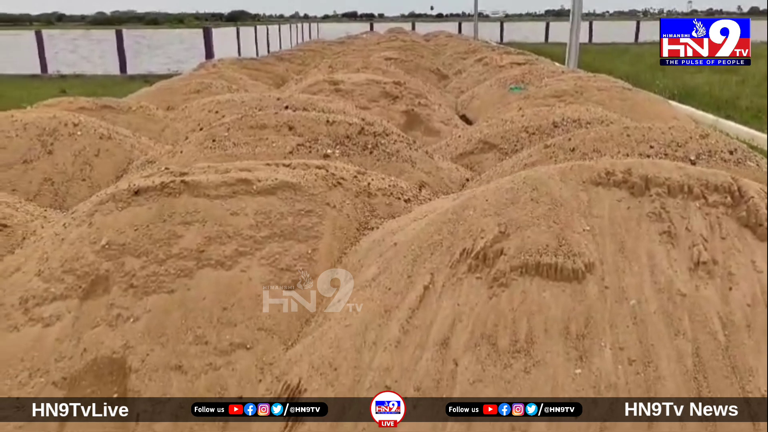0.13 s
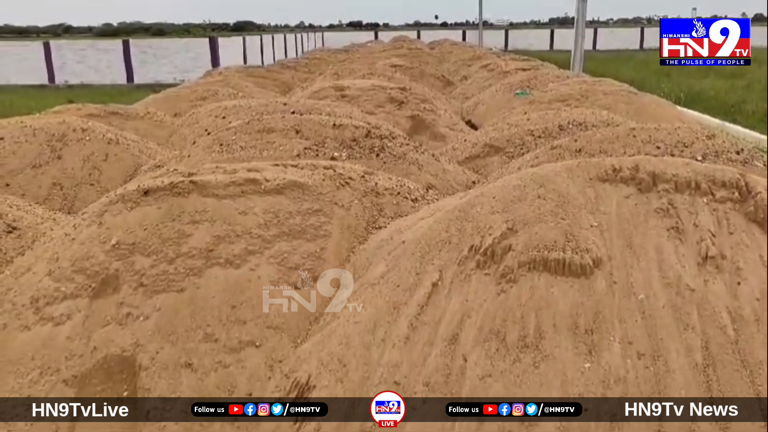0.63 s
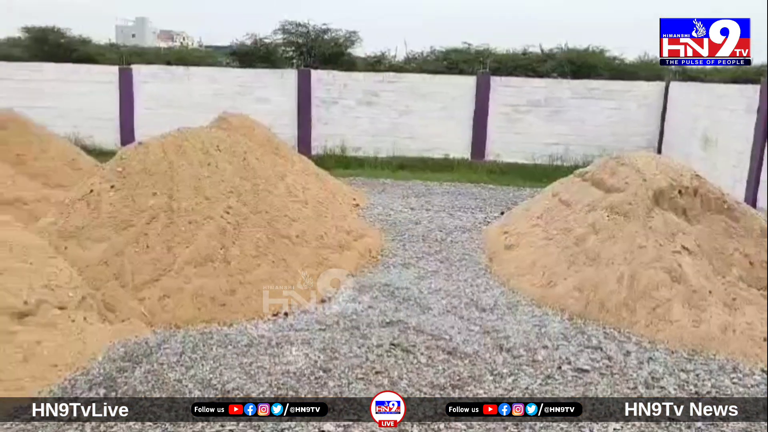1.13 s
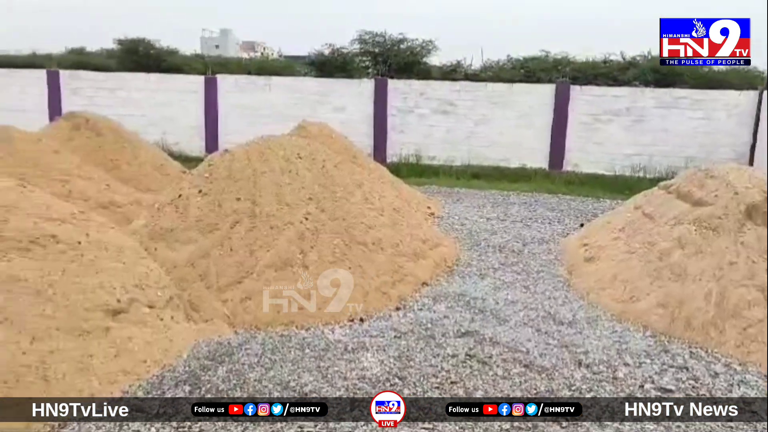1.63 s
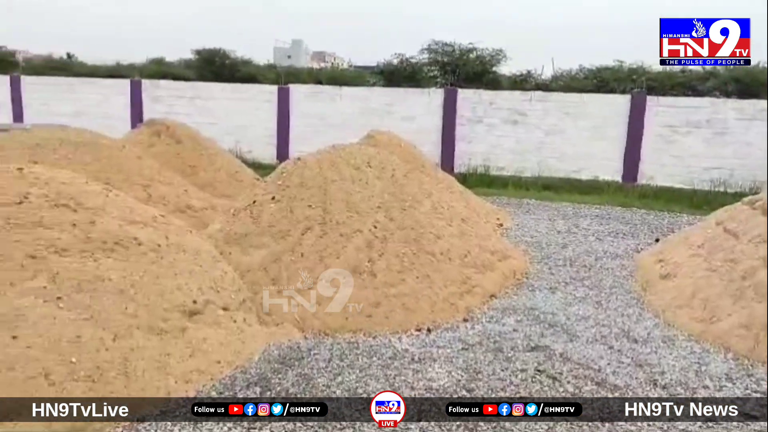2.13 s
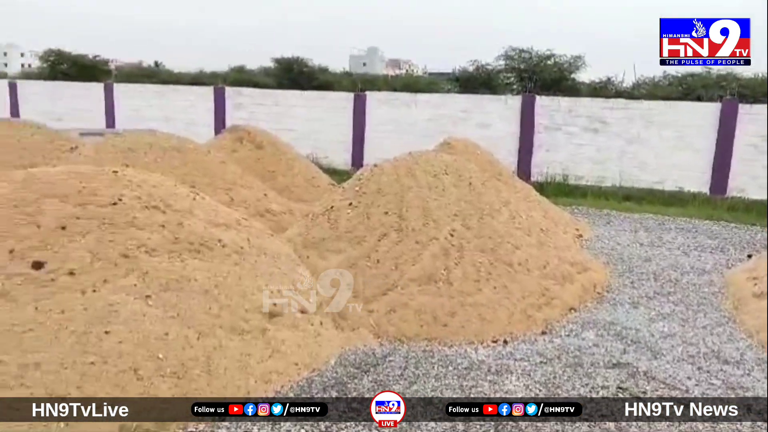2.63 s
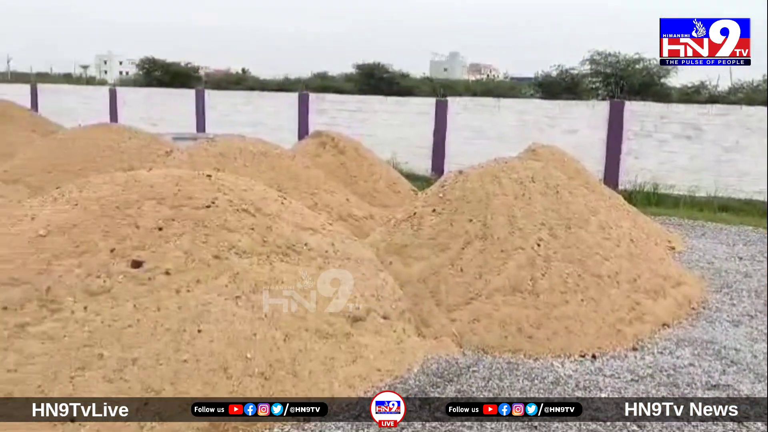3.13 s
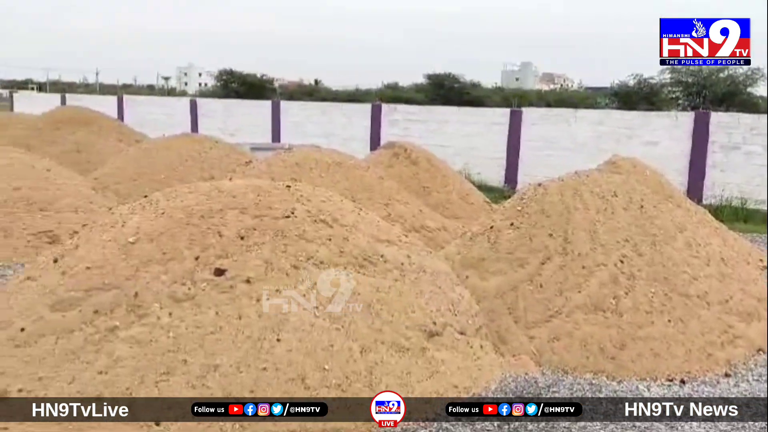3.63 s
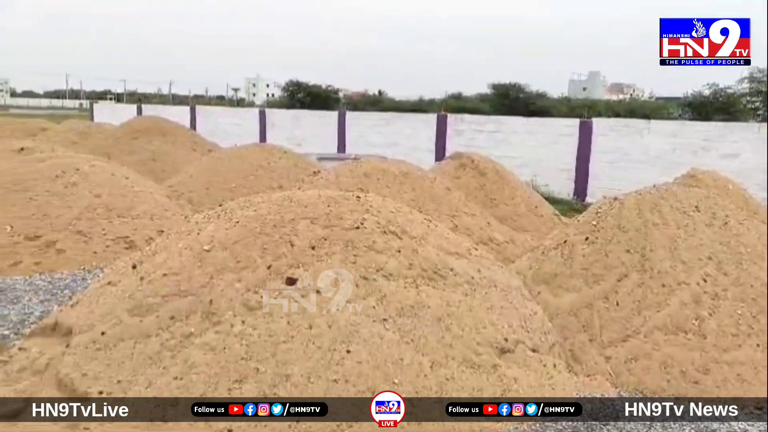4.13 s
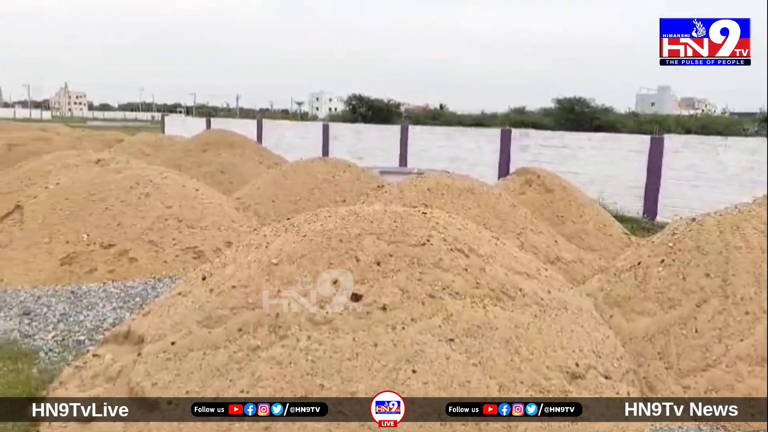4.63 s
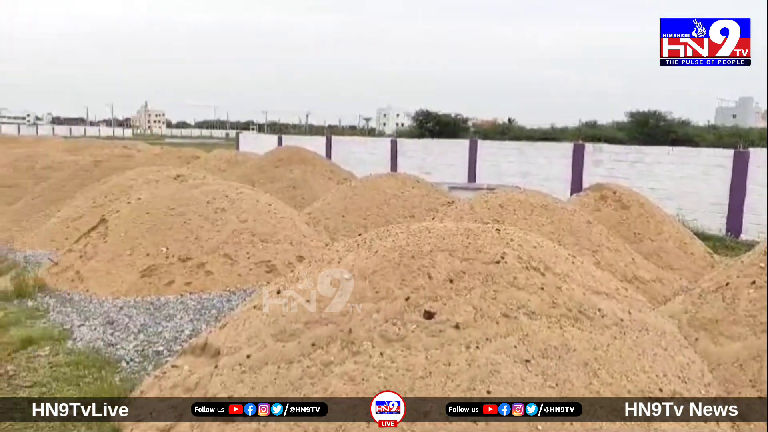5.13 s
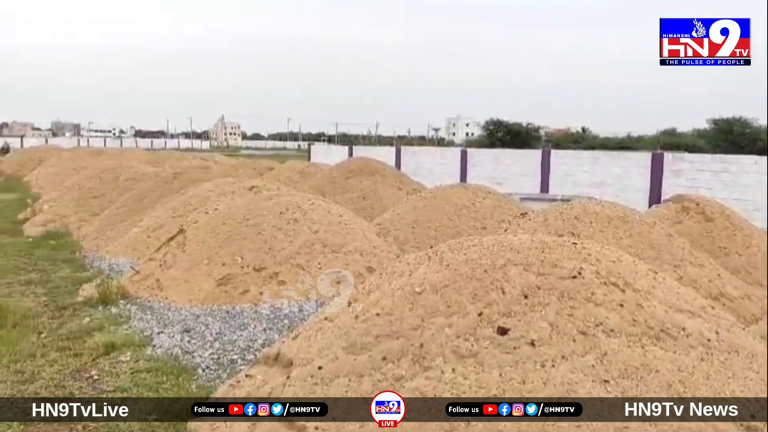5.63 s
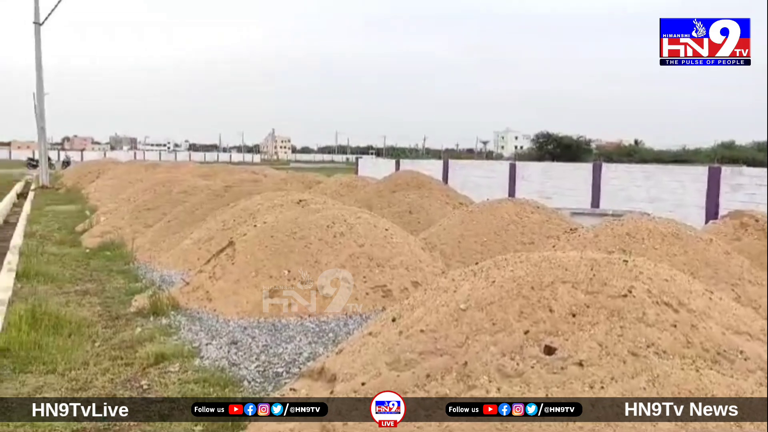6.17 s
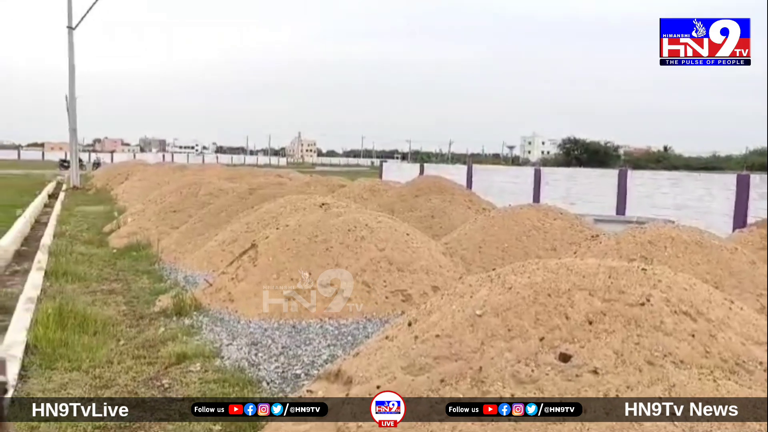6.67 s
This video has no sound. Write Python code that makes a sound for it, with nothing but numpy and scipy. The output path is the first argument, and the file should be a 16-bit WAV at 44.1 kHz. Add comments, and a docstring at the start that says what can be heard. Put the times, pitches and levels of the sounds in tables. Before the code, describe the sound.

Hard wind gusts thump and buffet the microphone, then after a quick cut insects drone and buzz while a small bird ticks and trills.

```python
"""Gusts of wind buffet two microphone ports, each on its own: lumpy low noise, with swings of pressure as eddies slap.
Around them is open ground: a field of insects drones as throbbing noise, one insect buzzes on the right in
bursts of short chirps, and another joins late as a shimmer. A small bird ticks and trills on the left in quick
sweeps, with chips, far calls, dry clicks and a smooth wash of air behind.
An edit fades the first, windier scene out and the second in."""
import sys
import numpy as np
from scipy import signal
from scipy.fft import rfft, irfft, next_fast_len
from scipy.io import wavfile
from scipy.ndimage import uniform_filter1d

SR = 44100
rng = np.random.default_rng(int(sys.argv[2]) if len(sys.argv) > 2 else 0)


def convert_level_to_amplitude(level_db):
    """Map a level in decibels to its linear amplitude factor."""
    exponent = np.asarray(level_db, float) / 20
    return 10 ** exponent


def waveform_to_disk(signal):
    """Save audio, clipped to [-1, 1], as 16-bit WAV at the path in sys.argv[1]."""
    frames = np.transpose(np.atleast_2d(signal))
    scaled = np.clip(frames, -1, 1) * 32767
    samples = np.round(scaled).astype(np.int16)
    wavfile.write(sys.argv[1], SR, samples)


N = 298998
T = np.arange(N) / SR  # time/s of every sample
LAG = 18  # samples by which a placed sound reaches the right port later

# breeze between the gusts: [t/s, left rumble level/dB, right rumble level/dB, flutter over rumble/dB]
BREEZE = [(0, -29, -33, 3), (.88, -30, -33.5, -9), (.93, -44, -44, -11), (1.3, -42, -40.5, -15.5),
          (2.3, -38.5, -43, -11), (3.1, -40, -42, -8), (3.9, -37, -38.5, -7.5), (4.5, -37.5, -36.5, -10),
          (5.3, -34, -35, -16), (6.78, -38, -34, -15.5)]
# gusts: [t/s, peak rumble level/dB, time to fall by 10 dB/s (0 = unheard), flutter over rumble/dB, left-right/dB]
GUSTS = [(.045, -23, .07, 8, 20), (.12, -12, .05, -6, 25), (.205, -10.5, .04, -2, 22),
         (.229, -16.5, 0.0254, -10, -24), (0.268, -9.5, 0.0429, 4, 26), (.354, -20, 0.0473, 2.5, -24),
         (0.432, -12.5, .035, 9.5, 21), (.49, -22, 0, -15, -24), (.539, -15, 0.034, 5.5, 28),
         (.6, -19, .045, 1.5, 24.5), (0.715, -9, 0.0642, 2, 30), (.83, -22, 0.0552, -7, 15),
         (1.334, -30, 0.08, -29, 18), (1.469, -19, .06, -18.5, 24), (1.703, -22, 0.07, -14, 13),
         (1.87, -23, 0.15, -29, 22), (2.04, -21.5, 0.05, -20, 25), (2.122, -23, 0.08, -19, 12),
         (2.486, -24.5, 0.12, -19, 21), (2.621, -29.5, 0.14, -14, 21), (2.826, -15.5, 0.08, -17, 24),
         (3.115, -15, 0.0568, -23, 28), (3.2, -24.5, .12, -28, 15), (3.364, -24.5, 0.22, -16, 10),
         (3.608, -13.5, 0.0642, -40, 26), (3.684, -23.5, 0.06, -38, -21), (3.868, -23, 0.07, -7.5, 18),
         (3.968, -20.5, 0.0548, -16, -12), (4.038, -22.5, .09, -17, 23), (4.103, -28, 0.1, -15, -12),
         (4.372, -27.5, .13, -28, 7), (4.68, -30.5, .15, -21, 5), (5.11, -27.5, 0.24, -20, 5),
         (5.431, -10.5, 0.0675, -22, 26), (5.56, -28.5, 0.3, -20, -2), (5.764, -28.5, 0.12, -16, 3),
         (5.924, -23.5, 0.1, -32, -16), (6.04, -20.5, 0.05, -38, -4), (6.188, -29, 0.4, -31, 14),
         (6.333, -24.5, 0.1, -33, -5), (6.722, -25.5, 0.12, -30, 3.5)]
GUST_RISE = 0.79  # rise time as a share of the fall time
# eddies that slap a port: [t/s, nominal peak level/dB, nominal f/Hz, left-right/dB]
SLAPS = [(0.093, -27, 300, 18), (0.138, -8, 330, 30.5), (.201, 1, 208, 37), (0.22, 0, 449, 41),
         (0.223, -3.5, 185, -29), (.242, -4, 350, 36), (0.25, -3.5, 193, 35), (0.258, -1.5, 196, 33),
         (0.352, -16, 257, -34), (.417, -9.5, 400, 31), (.434, -5, 216, 36), (0.477, -6.5, 450, 36),
         (0.485, -19, 110, -37), (0.533, -7, 398, 39), (0.58, -7, 330, 38), (0.606, -10.5, 395, 39),
         (.704, -8.5, 247, 30), (0.718, -10.5, 335, 37), (0.746, -14.5, 253, 30), (.816, -17, 300, 29),
         (1.47, -19, 105, 24), (1.741, -13, 111, 18), (2.035, -13.5, 116, 18), (2.817, -8.5, 128, 24),
         (2.88, -10, 98, 27), (3.104, -9.5, 124, 26), (3.571, -10.5, 76, 26), (2.822, -20.5, 345, 20),
         (3.958, -16, 118, -30), (5.409, -9.5, 84, 20), (5.471, -14.5, 135, 14)]
# crackles as the hardest gusts break: [t/s, relative level/dB]
CRACKLES = [(0.2034, -40.5), (0.2515, -43.5), (0.2553, -45), (0.2623, -45), (0.4369, -43)]
# insect field, one table a stretch: [t/s, relative level/dB, left-right before a 3 dB shift to the right/dB]
FIELD = [
    [(0.0, -52.5, 4.5), (0.144, -54, 4.5), (0.9, -59, 5.5)],
    [(1.05, -54.5, -4), (1.21, -53.5, 0.0), (4.15, -52.5, 8), (4.4, -51.5, 10.5), (5.09, -53, 7),
     (6.0, -55, 6)],
    [(6.1, -53.5, 8.5), (6.57, -51, 7), (6.78, -52, 7)],
]
# voices of the field, relative levels:
# [f/Hz, width/Hz, first scene left level/dB, right level/dB, second scene left level/dB, right level/dB]
FIELD_VOICES = [(4738, 440, -3.5, -2, -2, 0.5), (5180, 450, -21, -1.5, -6.5, -4.5),
                (5954, 530, 0, -4, 1.5, -5.5), (6550, 460, -8, -44, -3.5, -31),
                (7360, 450, -18, -40, -15.5, -29), (7770, 1200, -15.5, -16.5, -14.5, -19)]
# bursts of one insect: [start t/s, end t/s, relative start level/dB, relative end level/dB, left-right/dB]
BUZZES = [(2, 2.087, -54, -70, -6), (2.25, 2.357, -54.5, -64, -5), (2.47, 2.6, -61, -65, -10),
          (2.9, 3, -70, -81, -2), (3.2, 3.286, -74, -60, -5.5), (3.9, 4.031, -51, -60, -13),
          (4.15, 4.278, -54, -59, -10.5), (4.41, 4.525, -54, -56.5, -14), (4.62, 4.751, -52, -56, -11),
          (4.88, 5.01, -51, -57, -10), (5.2, 5.31, -51, -56, -6), (5.46, 5.594, -51, -52.5, -14),
          (5.72, 5.937, -53, -41, -9.5), (6, 6.211, -52, -40, -11), (6.258, 6.397, -48, -45.5, -12),
          (6.52, 6.668, -50, -45, -15)]
# the late insect: [t/s, level before its left-right shift/dB]
JOINER = [(6.14, -68), (6.22, -51), (6.55, -44), (6.78, -47)]
# its wing resonances: [f/Hz, width/Hz, relative level/dB]
JOINER_WINGS = [(4800, 300, 0.5), (5450, 320, -3.5), (5980, 280, 1)]
# pairs of bird ticks: [t/s, first peak level/dB, second peak level/dB]
TICKS = [(1.482, -38, -39), (1.8542, -33, -28), (2.6815, -23.5, -24), (3.5111, -24, -18.5),
         (4.339, -28, -27), (5.159, -28.5, -25), (5.9163, -27.5, -26), (6.304, -34.5, -48)]
TICK_GAP_S, TICK_PANS_DB = .0168, (9, 10)  # left-right of the first and the second tick
# bird trills: [first note t/s, last note t/s, loudest note level/dB,
#   steep start over the note before it fades/dB, left-right before a 5 dB shift to the left/dB]
TRILLS = [(1.36, 1.452, -46, -8, 17), (2.069, 2.159, -41, -3, 9), (2.7514, 2.808, -40.5, -1, 6),
          (3.3637, 3.4825, -38, 1, 11), (3.93, 3.9863, -43, -6, 7), (4.114, 4.1769, -39, -16, 27),
          (4.553, 4.6123, -44, -8, 8), (4.7536, 4.8207, -42, -12, 18), (5.2047, 5.2047, -39, -12, 6.5),
          (5.385, 5.5099, -39.5, -10, 14), (5.815, 5.874, -38.5, -8, 8), (6.026, 6.155, -38, -14, 9),
          (6.463, 6.4901, -41, -9, 9.5), (6.6885, 6.754, -36, -14, 12)]
NOTE_GAP_S, LOUDEST_NOTE = .031, 2  # notes are counted from 0
SWELL_DB, FADE_DB = 2, 3  # per note up to the loudest and after it
STEEP_FADE_DB = 3.5  # loss of the steep start per note
# low bird chips: [t/s, peak level/dB, nominal f/Hz, left-right/dB]
CHIPS = [(1.883, -38, 4260, -5), (2.1796, -41.5, 4400, 9), (2.707, -33, 4080, -4), (2.9593, -42, 4500, 0.0),
         (3.5383, -35, 4220, -7), (3.7274, -41, 4430, 0.5), (4.368, -34, 4130, -6),
         (5.1867, -32.5, 4180, -5.0), (5.9435, -34.5, 4280, 2), (6.0255, -40.5, 4420, -4)]
# faint whistles of far birds, one table each: [t/s, f/Hz, level before a 10.5 dB lift/dB]
WHISTLES = [
    [(.245, 3500, -69), (.275, 2750, -75), (.322, 2680, -72)],
    [(.48, 3900, -80), (.515, 2950, -77), (.55, 2550, -75)],
    [(.65, 3460, -58), (.654, 2420, -56)],
    [(.7, 3770, -75), (.734, 3920, -68), (.77, 2780, -69.5), (.79, 2660, -72), (.83, 2620, -80)],
    [(1.13, 2580, -72), (1.155, 2540, -75)],
]
# blurred calls from further off: [t/s, length/s, f/Hz, width/Hz, level/dB, left-right/dB]
FAR_CALLS = [(2.28, .12, 3770, 350, -56.5, -9), (2.284, 0.063, 1900, 500, -61, 4),
             (3.095, 0.48, 2080, 110, -69.5, 6), (3.107, 0.55, 1290, 110, -66.5, 19),
             (4.562, .05, 3700, 250, -58, 0), (4.62, .1, 3530, 300, -60, -12),
             (4.893, 0.064, 4300, 150, -55, -6), (5.103, 0.13, 3950, 250, -60, -6),
             (5.229, 0.043, 3640, 350, -52, -10), (5.729, .05, 3850, 200, -54.5, -13),
             (5.78, 0.038, 3020, 200, -60, -9), (5.8, .04, 3800, 250, -61, -11),
             (6.3, .03, 3300, 300, -61, -6)]
# dry clicks: [t/s, relative level/dB, left-right/dB]
CLICKS = [(2.6454, -50, -16), (2.7616, -52, -14), (4.8864, -40.5, -17)]
# colour of the distant wash of air and leaves: [f/Hz, relative left level/dB, relative right level/dB]
AIR = [(60, 4, -9), (150, -1.5, 1.5), (300, 0.5, 0.5), (450, 2, 1.5), (714, -3.5, -5), (1330, -12, -15.5),
       (1650, -19, -22), (1900, -17, -19.5), (2910, -24.5, -25), (3600, -26.5, -24), (8600, -40, -19.5),
       (9140, -62.5, -30), (9700, -63, -33.5), (10470, -53, -30), (11700, -39, -42.5), (15000, -40.5, -38)]
# its loudness: [t/s, level before a 3.5 dB lift/dB]
AIR_LEVEL = [(0, -54), (.5, -57), (.89, -58), (.93, -54.5), (2, -52), (3, -51.5), (4, -49.5), (5, -49),
             (6, -47), (6.78, -47.5)]
# likeness of the wash at the two ports: [f/Hz, likeness from 0 to 1]
AIR_SAME = [(100, 0.78), (400, 1), (1000, 0.46), (3000, 0.089), (10000, .3)]
# fade out of the first scene and into the second: [t/s, gain]
EDIT = [(.86, 1), (.896, .45), (.8961, 0), (.92, .02), (.94, .14), (.97, .5), (1, .72), (1.06, 1)]


def evened(x):
    """Scales to rms 1."""
    return x / np.sqrt(np.mean(x ** 2) + 1e-20)


def curve(rows):
    """Draws each column of a table as a line through time."""
    s, *columns = np.transpose(rows)
    return [np.interp(T, s, c) for c in columns]


def spectrum_grid():
    """Returns a fast transform size and the Hz of each of its bins."""
    size = next_fast_len(N)
    return size, np.arange(size // 2 + 1) * SR / size + 1


def coloured(shape_db, channels=1):
    """Noise whose spectrum in dB is a function of Hz."""
    size, hz = spectrum_grid()
    noise = rng.standard_normal((channels, size))
    return irfft(rfft(noise) * convert_level_to_amplitude(shape_db(hz)), size)[:, :N]


def band(low_hz, high_hz, rise_db, fall_db):
    """Noise that rises and falls by so many dB an octave beyond two corners."""
    def octaves(ratio):
        return np.log2(1 + ratio ** 4) / 4

    def shape_db(hz):
        return -rise_db * octaves(low_hz / hz) - fall_db * octaves(hz / high_hz)
    return evened(coloured(shape_db)[0])


def resonance(hz, centre_hz, width_hz):
    """A steep peak along frequency, in dB."""
    return -30 * np.log10(1 + ((hz - centre_hz) / width_hz) ** 2)


def strands(hz, width, depth_db):
    """Fine random peaks along frequency, in dB, so that single strands stand out of a smooth noise."""
    knots = np.arange(0, SR / 2 + width, width)
    return depth_db * np.interp(hz, knots, rng.standard_normal(4000)[:len(knots)])


def lumps(high_hz, depth_db):
    """Random gain of rms 1 that wavers up to about high_hz."""
    return evened(convert_level_to_amplitude(depth_db * band(2.8, high_hz, 12, 17.4)))


def place(mix, s, sound, pan_db):
    """Returns the two ports with a sound added, later at the right port."""
    out = mix.copy()
    start = round(s * SR)
    for port, (at, side) in enumerate(((start, -2), (start + LAG, 2))):
        part = out[port, at:at + len(sound)]
        part += sound[:len(part)] * np.sqrt(2 / (1 + convert_level_to_amplitude(side * pan_db)))
    return out


def pair(left, own, same):
    """The right port hears the left port's sound later, blended with its own."""
    same = np.clip(same, 0, 1)
    return np.array([left, same * np.roll(left, LAG) + np.sqrt(1 - same ** 2) * own])


def chirp(from_hz, to_hz, length, bend=1.0):
    """A short sweeping tone, length in s, in a soft window."""
    u = np.arange(round(length * SR)) / (length * SR)
    hz = to_hz + (from_hz - to_hz) * (1 - u) ** bend
    return np.sin(2 * np.pi * np.cumsum(hz) / SR) * np.sin(np.pi * u) ** 2


def gusts():
    """Rumble and flutter level in dB at each port: a breeze, and gusts that swell and die away."""
    t = T[::64]  # the levels move slowly, so a coarse time grid is enough
    s, left_db, right_db, flutter_db = np.transpose(BREEZE)
    calm_db = np.array([np.interp(t, s, left_db), np.interp(t, s, right_db)])
    power = convert_level_to_amplitude(2 * np.array([calm_db, calm_db + np.interp(t, s, flutter_db)]))
    for s, db, fall, flutter_db, pan_db in GUSTS:
        swell_db = db - 10 * np.maximum(t - s, (s - t) / GUST_RISE) / fall
        ports_db = swell_db + np.minimum(0, np.c_[[pan_db, -pan_db]])  # only the sheltered port is turned down
        power += convert_level_to_amplitude(2 * np.array([ports_db, ports_db + flutter_db]))
    return [[np.interp(T, t, 10 * np.log10(layer)) for layer in power[:, port]] for port in (0, 1)]


def wind(rumble_db, flutter_db):
    """Lumpy pressure at one port; strong flutter spills upward as a rasp."""
    rasp_db = -42.0 + 2.72 * (flutter_db + 14.5)
    shared = lumps(28, 4.5)
    rumble = convert_level_to_amplitude(rumble_db) * band(41, 80, 11, 24.2) * lumps(36, 2.08)
    flutter = convert_level_to_amplitude(flutter_db) * band(107.4, 164.0, 23, 21.45) * shared
    rasp = convert_level_to_amplitude(rasp_db) * band(280, 400, 22, 22.3) * shared * lumps(60, 2.6)
    return .85 * np.tanh((rumble + flutter + rasp) / .85)  # the port saturates


def slaps():
    """Each eddy is a sudden swing of pressure that slows down and dies in a few cycles."""
    mix = np.zeros((2, N))
    for s, db, hz, pan_db in SLAPS:
        sign = rng.choice([-1, 1])
        cycles = np.arange(round(8 * SR / hz)) * hz / SR
        turns = np.cumsum(0.614 + .5 * np.exp(-cycles / 1.01)) * hz / SR
        envelope = np.exp(-cycles / 0.98) * (1 - np.exp(-cycles / .5)) ** 2
        swing = np.sin(2 * np.pi * turns) * envelope
        mix = place(mix, s, 2.49 * sign * convert_level_to_amplitude(db) * swing, pan_db)
    return mix


def crackles():
    """Each crackle is a kink in the pressure at the left port, falling off steeply with frequency."""
    mix = np.zeros((2, N))
    t = np.arange(200) / SR
    kink = t / 0.00032 * np.exp(-t / 0.00059)
    for s, db in CRACKLES:
        mix = place(mix, s, 25 * convert_level_to_amplitude(db) * kink, 30)
    return mix


def drone():
    """Many insects: throbbing noise in a few steep wing resonances."""
    level_db, pan_db = curve(np.concatenate(FIELD))
    second_scene = T > EDIT[2][0]
    mix = np.zeros((2, N))
    for centre_hz, width, *db in FIELD_VOICES:
        def shape_db(hz):
            lid_db = -10 * np.log10(1 + (hz / 8700) ** 60)  # little is left above 8700 Hz
            return resonance(hz, centre_hz, width) + lid_db + strands(hz, 35, 2.8)
        left, own = coloured(shape_db, channels=2)
        voice = pair(evened(left), evened(own), 0.16)
        voice = voice * lumps(90, 0.84) * lumps(4.6, 0.72)  # a quick and a slow throb
        mix += voice * convert_level_to_amplitude(np.where(second_scene, np.c_[db[2:]], np.c_[db[:2]]))
    return mix * convert_level_to_amplitude(level_db + np.outer([.5, -.5], pan_db - 3.0))


def buzz():
    """Wing strokes about 165 a second, each a falling chirp; bursts change level and stop short."""
    mix = np.zeros((2, N))
    low, high = (chirp(top_hz, 0.82 * top_hz, 0.0042) for top_hz in (8200, 8850))
    for start, end, start_db, end_db, pan_db in BUZZES:
        t = np.arange(round((end - start) * SR)) / SR
        uneven = 1 + .6 * uniform_filter1d(rng.standard_normal(len(t)), 300)
        strokes = np.diff(np.floor(np.cumsum(165 * uneven) / SR), prepend=0)  # one spike a stroke
        corners_s = [0, .025, t[-1] - .008, t[-1]]
        burst_db = np.interp(t, corners_s, [start_db - 7, start_db, end_db, end_db - 5])
        strokes *= convert_level_to_amplitude(burst_db + 1.9 * rng.standard_normal(len(t)))
        warm = np.clip(t / 0.056, 0, 1)  # the first strokes are lower
        sound = 2.3 * (np.convolve(strokes * (1 - warm), low) + np.convolve(strokes * warm, high))
        echo = np.pad(sound, (130, 0)) * 0.21  # 130 samples later
        mix = place(mix, start, np.pad(sound, (0, 130)) + echo, pan_db)
    return mix


def joiner():
    """One nearer insect: a smooth shimmer in narrow bands that swells over the field."""
    def wings(hz):
        return 10 * np.log10(sum(convert_level_to_amplitude(2 * (db + resonance(hz, centre_hz, width)))
                                 for centre_hz, width, db in JOINER_WINGS))
    left, own = coloured(wings, channels=2)
    return pair(evened(left), evened(own), .6) * convert_level_to_amplitude(curve(JOINER)[0] + np.c_[[2.5, -2.5]])


def ticks():
    """Each tick is a very short falling sweep."""
    mix = np.zeros((2, N))
    for s, *pair_db in TICKS:
        for at, db, pan_db in zip((s, s + TICK_GAP_S), pair_db, TICK_PANS_DB):
            mix = place(mix, at - .0006, convert_level_to_amplitude(db) * chirp(8220, 5460, 0.00407), pan_db)
    return mix


def trill_notes():
    """Evenly spaced notes that swell to the third and fade: rows of (t/s, peak/dB, steep start/dB, left-right/dB)."""
    notes = []
    for first, last, db, steep_db, pan_db in TRILLS:
        k = np.arange(round((last - first) / NOTE_GAP_S) + 1)
        peak_db = db - np.maximum(SWELL_DB * (LOUDEST_NOTE - k), FADE_DB * (k - LOUDEST_NOTE))
        start_db = peak_db + steep_db - STEEP_FADE_DB * k
        notes += zip(np.linspace(first, last, len(k)), peak_db, start_db, np.full(len(k), pan_db))
    return notes


def trills():
    """Each note is a gently falling sweep; early notes drop in steeply from above."""
    mix = np.zeros((2, N))
    for s, db, steep_db, pan_db in trill_notes():
        mix = place(mix, s - .003, convert_level_to_amplitude(steep_db) * chirp(8200, 6700, 0.005), -1.5)
        mix = place(mix, s - .0015, convert_level_to_amplitude(db) * chirp(7050, 6300, 0.015), pan_db + 5.0)
    return mix


def chips():
    """Each chip is a quick steep rise under a sweep that bends up to its pitch."""
    mix = np.zeros((2, N))
    for s, db, hz, pan_db in CHIPS:
        mix = place(mix, s - .003, convert_level_to_amplitude(db - 7.5) * chirp(0.52 * hz, 1.15 * hz, 0.0042), pan_db)
        mix = place(mix, s - .002, convert_level_to_amplitude(db) * chirp(0.82 * hz, 1.007 * hz, 0.0097, bend=3.5), pan_db)
    return mix


def whistles():
    """Each whistle is a sine that glides along its table and wavers in level."""
    mix = np.zeros((2, N))
    for rows in WHISTLES:
        hz, db = curve(rows)
        on = (T >= rows[0][0]) & (T < rows[-1][0])
        tone = convert_level_to_amplitude(db + 10.5) * lumps(60, 2.2) * np.sin(2 * np.pi * np.cumsum(hz) / SR)
        mix = place(mix, rows[0][0], tone[on] * signal.windows.tukey(on.sum(), .2), -24.0)
    return mix


def far_calls():
    """Each far call is a blur: a short piece of noise around one pitch."""
    mix = np.zeros((2, N))
    for s, length, centre_hz, width, db, pan_db in FAR_CALLS:
        noise = evened(coloured(lambda hz: resonance(hz, centre_hz, width))[0])
        blur = noise[:round(length * SR)]
        mix = place(mix, s, convert_level_to_amplitude(db) * blur * signal.windows.tukey(len(blur), .6), pan_db)
    return mix


def birds():
    """All bird sounds, scattered by the ground: a short, dying tail of random echoes."""
    mix = ticks() + trills() + chips() + whistles() + far_calls()
    taps = rng.standard_normal((2, 2000)) * 0.024 * np.exp(-np.arange(2000) / 500)
    taps[:, :100] = 0
    taps[:, 0] = 1  # the direct sound
    return signal.oaconvolve(mix, taps, axes=1)[:, :N]


def clicks():
    """Tiny dry snaps: about two milliseconds of noise each, dying fast."""
    mix = np.zeros((2, N))
    for s, db, pan_db in CLICKS:
        snap = np.diff(rng.standard_normal(90)) * np.exp(-np.arange(89) / 22)
        mix = place(mix, s, .7 * convert_level_to_amplitude(db) * snap, pan_db)
    return mix


def air():
    """A smooth wash of noise, partly common to both ports."""
    size, hz = spectrum_grid()

    def read(f, v):
        return np.interp(np.log(hz), np.log(f), v)
    f, left_db, right_db = np.transpose(AIR)
    same = np.clip(read(*np.transpose(AIR_SAME)), 0, 1)
    left, own = rfft(rng.standard_normal((2, size))) * convert_level_to_amplitude(strands(hz, 45.76, 1.48))
    late = left * np.exp(-2j * np.pi * hz * LAG / SR)  # the left sound, later
    right = same * late + np.sqrt(1 - same ** 2) * own
    wash = irfft([left * convert_level_to_amplitude(read(f, left_db)), right * convert_level_to_amplitude(read(f, right_db))], size)[:, :N]
    return evened(wash) * convert_level_to_amplitude(curve(AIR_LEVEL)[0] + 3.5) * lumps(8.1, 0.96)


def scene():
    """All sources at the two ports."""
    gusty = np.array([wind(*port) for port in gusts()]) + slaps() + crackles()
    insects = drone() + buzz() + joiner()
    return gusty + insects + birds() + clicks() + air()


def band_limit(x):
    """A steep low-pass at the top of the band."""
    return signal.sosfilt(signal.butter(12, 15400, fs=SR, output="sos"), x)


def record(dry):
    """The strongest gusts overload with a tight knee; then the edit fades between the scenes."""
    rounded = dry / (1 + abs(dry) ** 16) ** (1 / 16)
    edited = rounded * curve(EDIT)[0]
    return band_limit(edited)


dry = scene()
out = record(dry)
waveform_to_disk(out)
```